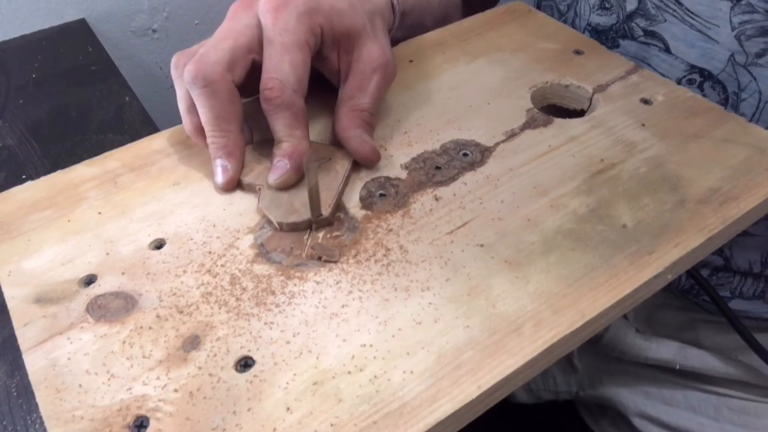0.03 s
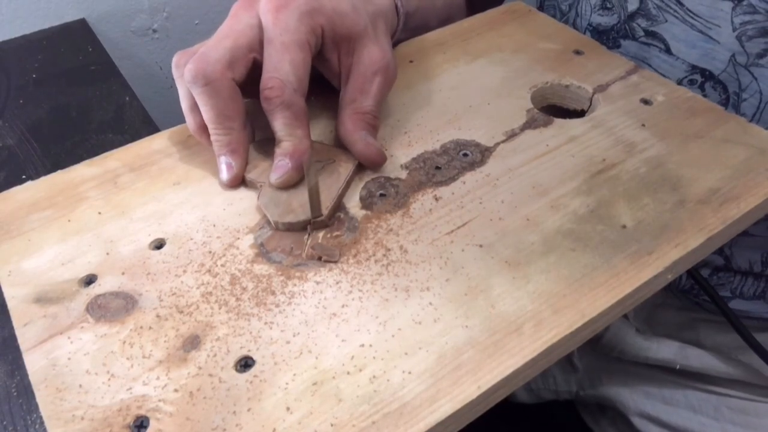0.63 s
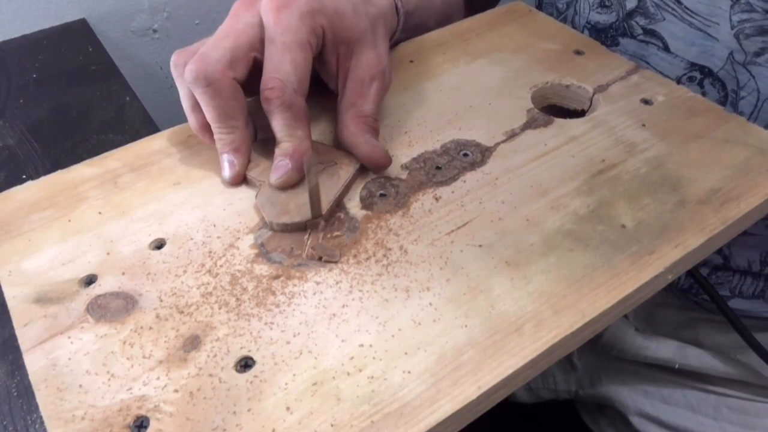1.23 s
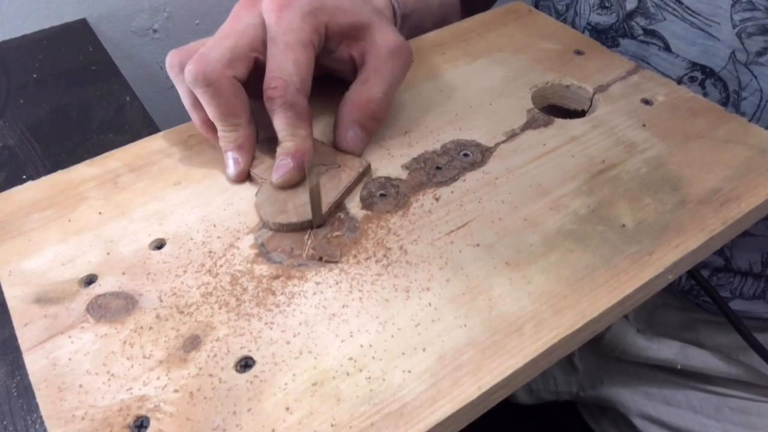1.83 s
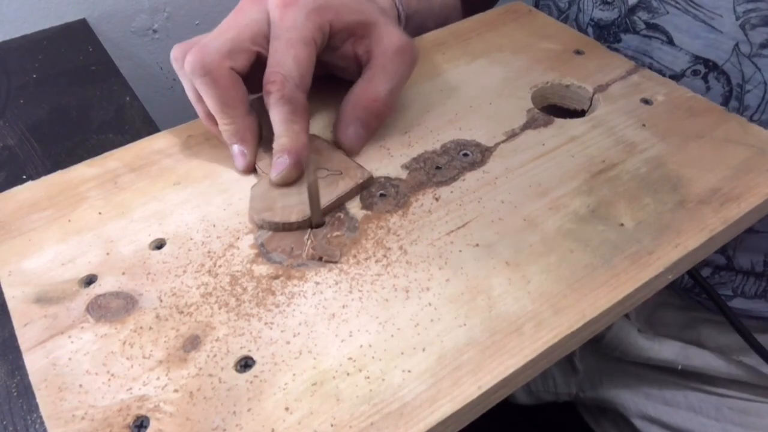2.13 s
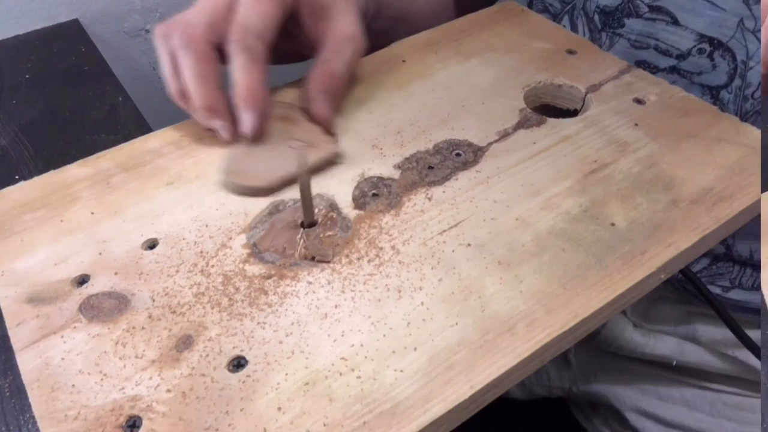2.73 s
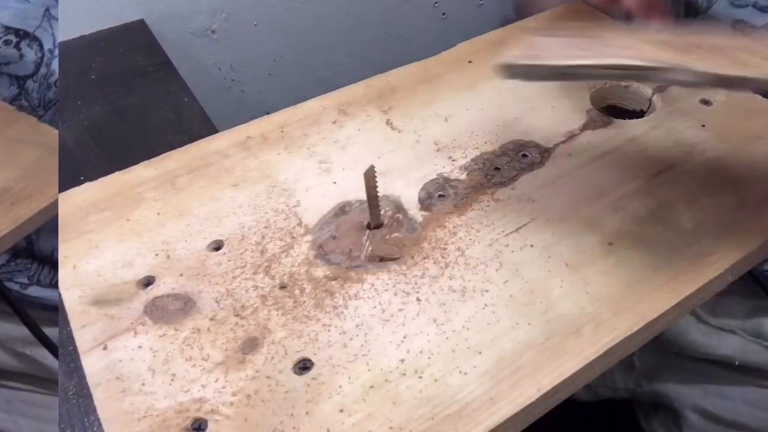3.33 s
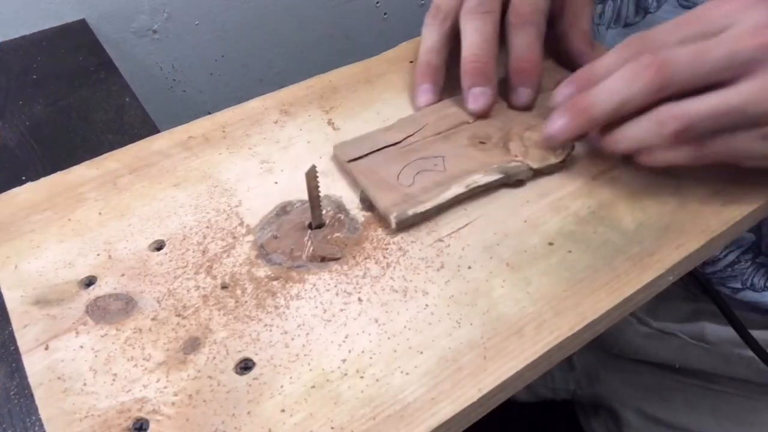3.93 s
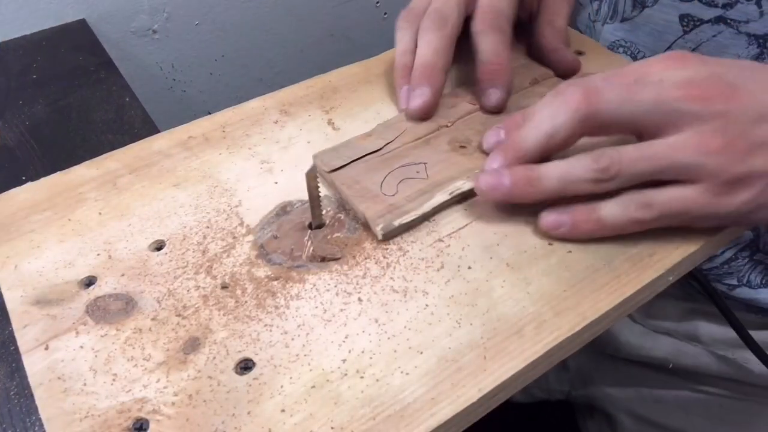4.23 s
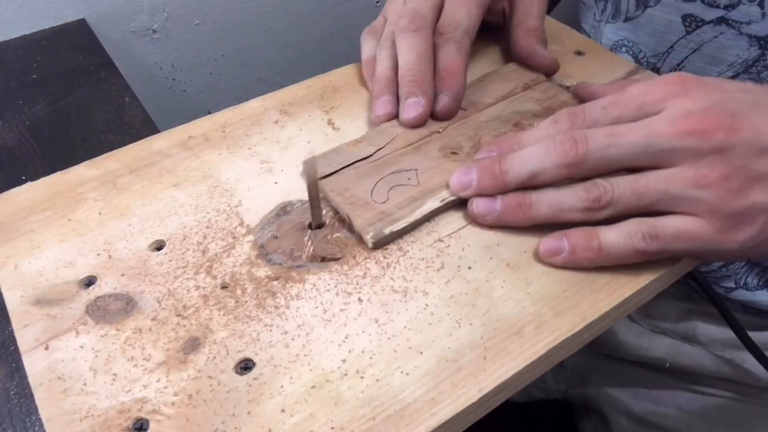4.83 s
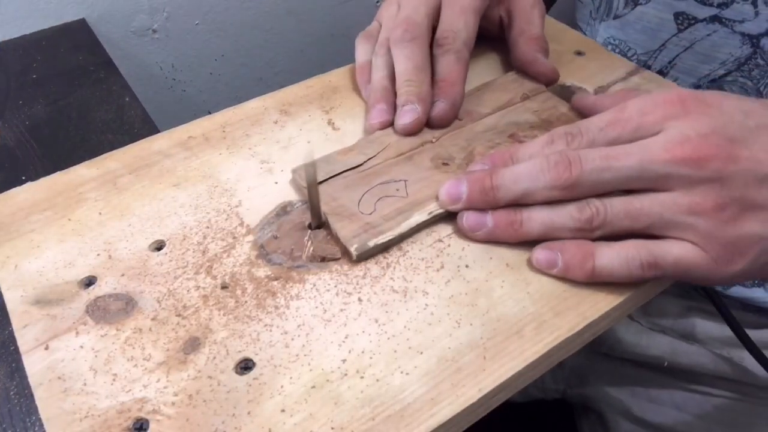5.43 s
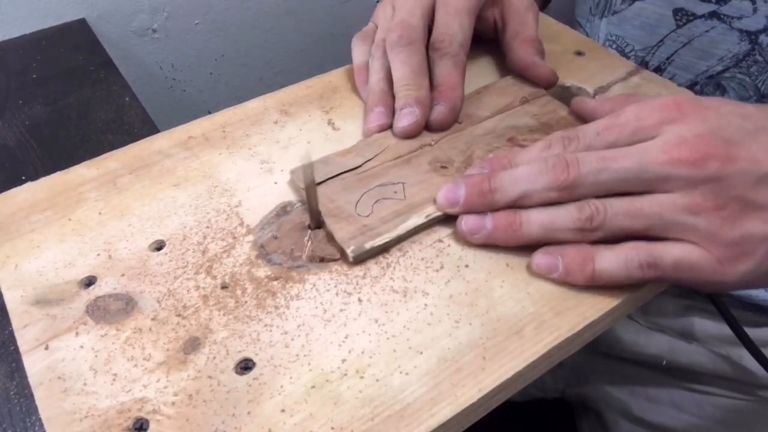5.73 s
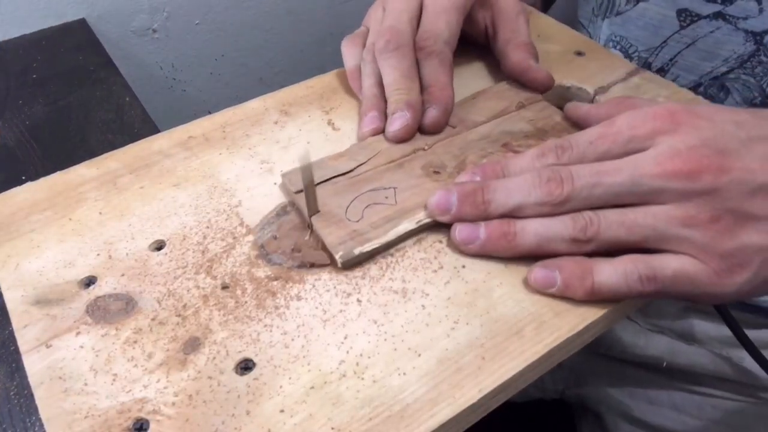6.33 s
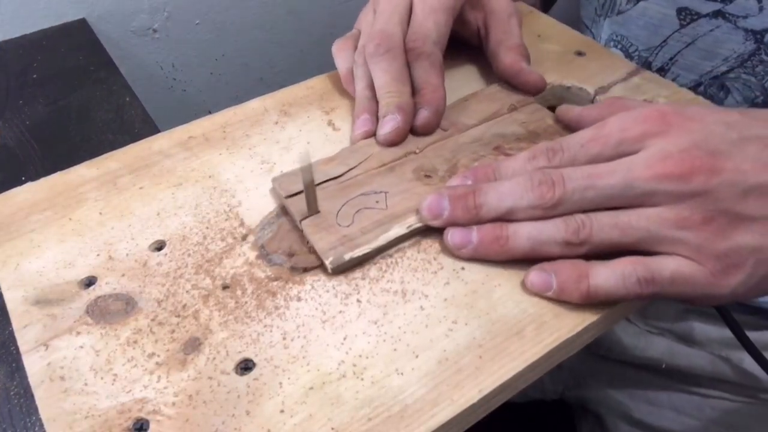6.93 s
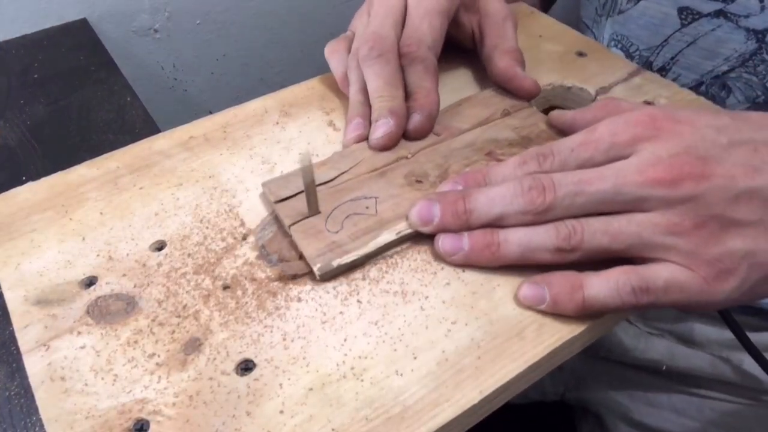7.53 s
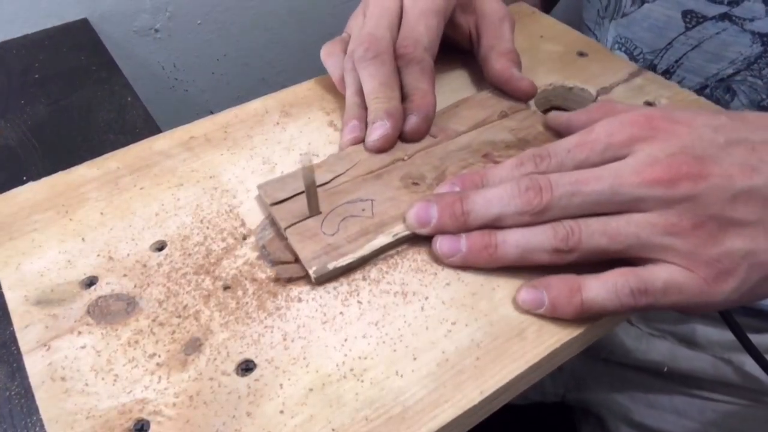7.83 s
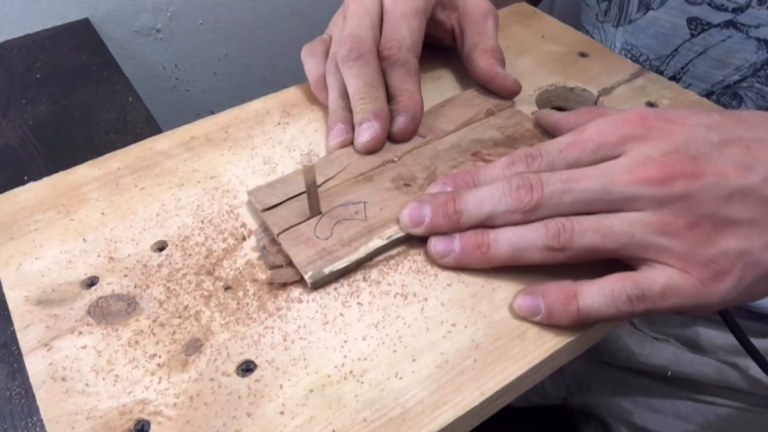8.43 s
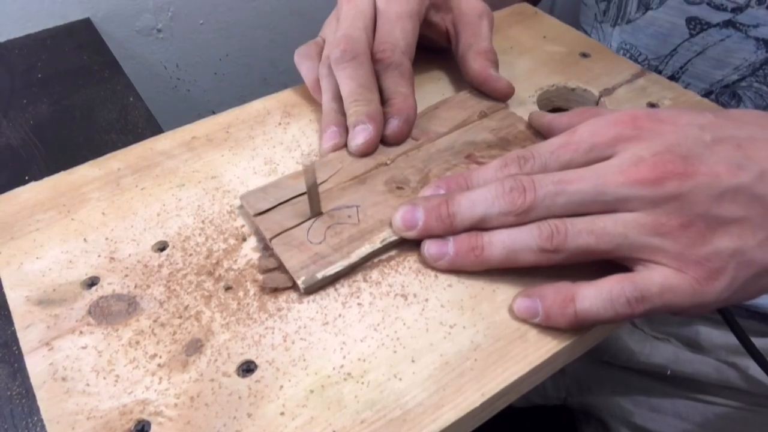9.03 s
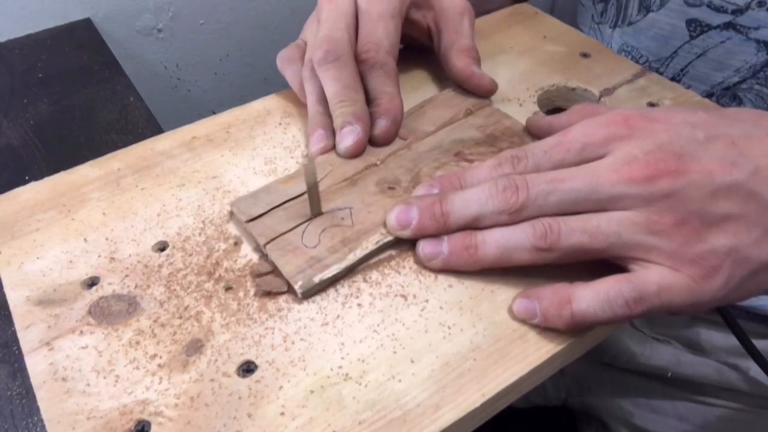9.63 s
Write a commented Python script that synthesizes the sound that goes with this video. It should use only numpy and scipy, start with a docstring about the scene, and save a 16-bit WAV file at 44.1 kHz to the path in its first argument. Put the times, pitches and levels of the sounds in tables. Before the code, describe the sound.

An electric jigsaw mounted under a wooden workbench is already cutting a small piece of wood, heard close in a small workshop. Gears rattle, teeth rasp and the bench drums, while the blade squeaks and gives short high chirps. At about 1.9 seconds the cut ends and the saw runs free, then winds down from 2.4 seconds, falling silent near 3.5. Around 3.4 seconds a board lands on the bench with a few quick hollow knocks, followed by faint scrapes and taps as it slides into place. At 4.5 seconds the saw restarts with a clack and spins up. The board chatters against the blade from about 5.3 seconds, and the teeth catch at 5.5. Steady, buzzing sawing continues until the end at about 9.5 seconds, with a low boom from the bench and a thin, high squeal from the blade.

```python
"""Small workshop, microphone close to a jigsaw mounted blade up under a plywood bench.
The saw is finishing a cut in a small piece of wood: gears rattle, the teeth rasp twice a stroke, the
bench drums, the blade squeaks in the kerf. It runs free and coasts down from 2.4 s. At 3.4 s a board
is knocked onto the bench and slid into place. The saw restarts with a clack at 4.5 s; the board chatters
against the blade, then the teeth catch at 5.5 s and cut on to the end while the bench booms."""
import sys
import numpy as np
from scipy import signal
from scipy.fft import rfft, irfft, next_fast_len
from scipy.io import wavfile
from scipy.ndimage import uniform_filter1d, minimum_filter1d, map_coordinates

SR = 44100
rng = np.random.default_rng(int(sys.argv[2]) if len(sys.argv) > 2 else 0)


def transcribe(signal):
    """Save signal, clipped to [-1, 1], as a 16-bit WAV file at the path in sys.argv[1]."""
    frames = np.atleast_2d(signal).T
    limited = np.clip(frames, -1, 1)
    pcm = np.round(limited * 32767).astype(np.int16)
    wavfile.write(sys.argv[1], SR, pcm)


N = 427329
TIME = np.arange(N) / SR

# spectra of room tone, scrape, crack, gears and each cut's rasp: (frequency [Hz], relative level [dB])
ROOM_TONE_SPECTRUM = [(15, -36), (25, -14.5), (106, 7), (335, -16), (1000, -6), (1180, -2), (1390, -20),
                      (5010, -24), (15000, -41)]
SCRAPE_SPECTRUM = [(120, -40), (200, -3), (272, -10), (350, -8), (581, -22), (1170, -17), (2020, -14),
                   (2850, -18), (3230, -15.5), (5360, -18), (15000, -33)]
CRACK_SPECTRUM = [(50, -12), (120, -3), (400, -2), (800, 2), (1300, 3), (4000, 0), (8000, -8.5),
                  (15000, -24)]
GEAR_SPECTRUM = [(35, -26), (100, -17), (145, -19.5), (205, -4.5), (270, -7.5), (340, -7.5), (470, -11),
                 (660, -7), (900, -9.5), (1150, -3.5), (1540, -9), (2400, -7.5), (4400, -9), (6000, -15.5),
                 (9000, -19), (14000, -31), (15700, -26)]
PIECE_RASP = [(300, -10.5), (1000, -10.5), (2500, -6), (3400, -6), (4300, 1), (5500, -3.5), (7300, -8.5),
              (8500, -11), (11500, -19), (14000, -16), (15700, -21.5)]
BOARD_RASP = [(300, -44), (1000, 1), (2500, -9), (3500, -3), (4500, 2), (6000, 2), (7500, 1), (8500, -6),
              (11500, -8), (14000, -12.5), (15700, -26)]
# decay of the workshop: (frequency [Hz], t60 [s])
ROOM_DECAY = [(100, 0.44), (1000, 0.23), (5000, 0.22), (15000, 0.26)]

# shoves of the board over the bench: (start [s], end [s], scrape [dB], groan [dB])
BOARD_SHOVES = [(3.64, 3.678, -55, -67), (3.686, 3.756, -47, -62), (3.837, 3.955, -63, -58),
                (3.996, 4.12, -64, -65), (4.186, 4.208, -58.5, -69), (4.341, 4.365, -59.5, -71),
                (4.445, 4.517, -67.5, -71)]
# wood set down and nudged, then a clack as the saw restarts:
# (time [s], crack [dB], thump [dB], hollow note [dB])
KNOCKS_AND_CLACK = [(3.379, -21, -44, -39), (3.402, -60, -46, -60), (3.433, -18.5, -29, -21),
                    (3.495, -13.5, -26, -27), (3.541, -32, -29.5, -32), (3.659, -47, -45, -52),
                    (3.696, -39, -53, -42), (4.207, -50, -67, -66), (4.245, -69, -58, -66),
                    (4.523, -46, -77, -70), (4.540, -29, -37, -38)]
# ring of the bench top: (frequency [Hz], level [dB], t60 [s])
BENCH_MODES = [(88, -6, .22), (113, 0, .3), (165, -4, .17), (199, 0, .21), (262, -8, .12), (345, -7, .17),
               (447, -11, .13), (721, -12, .12), (1157, -12, .09), (1400, -12, .06), (1830, -17, .06)]
# resonances: (frequency [Hz], width [Hz], relative level [dB])
FACE_MODES = [(1180, 150, -4), (1600, 120, -9), (1970, 220, -1), (3230, 290, -4), (5300, 600, -1),
              (7860, 700, -11)]  # the board's face rubbing on the bench
HOUSING_AND_HISS = [(345, 30, -4.5), (662, 40, -4), (1170, 80, -5), (1790, 50, 1), (2020, 70, -9),
                    (2450, 70, -4), (2790, 90, -4), (3200, 100, -4), (3480, 80, -4), (4260, 160, -5),
                    (5000, 160, -7), (5620, 60, -12), (11450, 300, -19), (15550, 200, -14)]  # the saw's housing ringing, plus a thin high hiss while it runs
GEAR_CASE_MODES = [(1450, 300, -45), (1604, 54, -33.5), (1697, 44, -37.5), (1790, 60, -36)]  # the mesh tone swells as it crosses these
PIECE_MODES = [(2540, 47, -5), (2720, 40, -9), (3304, 190, 2), (3970, 130, 3), (4270, 110, -8.5),
               (5110, 60, -12), (6720, 200, -4.5), (7330, 150, -3)]  # the small piece under the teeth
BOARD_MODES = [(2370, 310, -1.5), (3450, 170, -4), (3855, 210, 2), (4330, 170, -0.5), (4830, 38, -3),
               (5530, 63, -10)]  # the board under the teeth
SLAP_MODES = [(538, 44, -8.5), (670, 124, -3), (1050, 580, -5), (1136, 94, 1), (1365, 110, -9),
              (2240, 210, -2.5)]  # the work slapped on the bench
LOOSE_BOARD_MODES = [(355, 60, -1), (525, 70, -4), (692, 70, 1), (850, 90, -5), (1130, 110, -1)]  # the board slammed as the teeth catch
BOOM_MODES = [(111.5, 11, 0), (196, 26, -11.5), (261, 16, -12.5), (298, 18, -16.5), (337, 26, -11.5),
              (480, 24, -22), (646, 22, -13), (688, 16, -15), (848, 24, -18), (965, 36, -15)]  # the bench, driven by harmonics of the stroke

# crank speed under power, sagging as the wood is pushed: (time [s], speed [strokes/s])
FIRST_RUN_SPEED = [(0.0, 38.7), (0.07, 39.0), (0.52, 39.5), (1.41, 39.2), (1.68, 39.5), (1.91, 40.0),
                   (2.26, 41.3), (2.42, 41.1)]
SECOND_RUN_SPEED = [(5.6, 40.6), (5.82, 40.3), (6.0, 39.2), (6.36, 37.6), (7.22, 36.9), (7.59, 37.5),
                    (8.04, 37.6), (8.88, 38.5), (9.48, 38.5), (9.69, 38.8)]
# gear rattle of each run: (level at full speed [dB], exponent of speed, base plate within it [dB])
RUN_RATTLE = [(-26, 1.65, -10), (-23.5, 0.68, -5.5)]
# ring of the saw's base plate: (frequency [Hz], width [Hz])
PLATE_MODES = [(1152, 75), (1212, 75)]
# bench vibration from the plunger and from each cut: (multiple of the stroke rate, relative level [dB])
SHAKE_HARMONICS = [(2, 0), (4, -11), (5, -3), (6, -10)]
PIECE_DRUM = [(3, -2), (4, -13), (5, 1.5), (6, -3.5), (7, -8), (9, -8), (10, -12), (11, -8), (13, -11),
              (14, -13), (15, -14), (17, -8)]
BOARD_DRUM = [(6, -3), (10, -8), (11, -9), (13, -8), (15, -6), (16, -8), (19, -10), (20, -8), (21, -8),
              (23, -8), (27, -5), (28, -2), (29, 0), (30, -3), (36, -4), (39, -3)]
# within one stroke, up then down: (position [cycles], relative level [dB])
TOOTH_PRESSURE = [(0, -2), (.04, 8), (.2, 4), (.35, 6), (.45, 2.5), (.57, 8.5), (.68, 6.5), (.88, -0.5)]
PLUNGER_REVERSALS = [(0.051, 0), (.55, -3)]
WORK_SLAPS = [(0.051, 13.5), (0.361, 2.5), (.62, -11)]
# the kerf pinches the blade: (start [s], end [s], attack [s], pitch [Hz], half width [Hz], level [dB])
KERF_PINCHES = [(0, .5, 0.086, 13100, 900, -39), (0.474, .82, .1, 6950, 600, -33),
                (.58, 1.55, .15, 4240, 450, -36), (1.09, 1.24, 0.06, 6350, 200, -34),
                (1.413, 1.78, .08, 9650, 350, -45), (1.43, 1.8, .08, 14350, 400, -42),
                (5.45, 9.7, 0.97, 6394, 136, -28.5), (5.55, 9.7, 0.079, 5600, 200, -38),
                (5.802, 9.7, 0.75, 4800, 90, -42), (5.7, 9.7, .3, 7250, 200, -41),
                (7.75, 9.7, 0.34, 7200, 200, -33.5), (8.5, 9.7, 0.33, 1090, 110, -43)]
# single strokes that catch: (time [s], level before trim [dB], pitch [Hz])
KERF_CHIRPS = [(0.5144, -16, 7180), (0.7444, -13.5, 7210), (1.2316, -15, 6230), (1.488, -18, 6080),
               (1.5219, -21, 5620), (1.5723, -13, 5390), (1.6736, -12, 5660), (1.7024, -16, 5590),
               (1.7874, -14, 5440), (1.8572, -14, 6480), (1.9071, -12, 6920), (1.932, -11, 7100),
               (1.957, -10.5, 7230)]
# the small piece, then the board: (start [s], end [s], attack [s], release t60 [s], gear load [0-1],
# rasp [dB], ring [dB], slap [dB], drumming [dB], boom [dB])
SAW_CUTS = [(-.3, 1.862, 0.25, .4, 0.02, -24.5, -29, -40, -31.5, -61),
            (5.5, 9.7, 0.18, .5, 0.51, -29, -30.5, -30, -33.5, -24)]

OFF_S, COAST_S = 2.42, 1.3  # switched off; friction stops the crank in this time
STALL_S, STALL_FADE_S = 3.51, 0.098  # the gears fall silent once the crank barely turns
ON_S, SPIN_UP_S = 4.535, 0.21  # switched on again; time constant of the run-up
FULL_SPEED, SLOWEST_SPEED = 41.5, 36.9  # working range [strokes/s]
GEAR_TEETH, ROTOR_RATIO = 43, 8.6  # tooth contacts and armature turns per stroke
IDLE_LOAD, LOADED_RATTLE_DB = 0.059, -5.5  # gear load running free; change of the rattle at full load
HOUSING_DB, SHAKE_DB = -8, -36  # housing ring and hiss within the rattle; plunger shake at full speed
HOUSING_HELD_DB, PLATE_HELD_DB, SHAKE_HELD_DB = -6.5, -4.5, -7.5  # change with wood on the blade


def amp(db):
    """Decibels to gain."""
    return 10 ** (np.asarray(db) / 20)


def unit(x):
    """Scale to rms 1."""
    return x / np.sqrt(np.mean(x ** 2) + 1e-20)


def along(points, hz):
    """Interpolate (frequency [Hz], value) points on a log axis."""
    f, v = np.transpose(points)
    return np.interp(np.log(hz + 1), np.log(f + 1), v)


def wobble(rate):
    """A smooth random curve, rate knots a second."""
    knots = np.arange(0, N * rate / SR + 1, 1 / 8)
    curve = map_coordinates(rng.standard_normal(int(knots[-1]) + 4), [knots])
    return np.interp(TIME * rate, knots, curve)


def grains(rate, spread_db):
    """Tiny random impacts of uneven size, rate a second."""
    hits = (rng.random(N) < rate / SR) * rng.standard_normal(N)
    return unit(hits * amp(spread_db * rng.standard_normal(N)))


def envelope(start, end, attack, t60):
    """A straight rise, a hold until the end, then an exponential release."""
    return np.clip((TIME - start) / attack, 0, 1) * amp(-60 * np.maximum(TIME - end, 0) / t60)


def filtered(x, response):
    """x through a frequency response."""
    size = next_fast_len(N + SR // 2)
    return irfft(rfft(x, size) * response(np.fft.rfftfreq(size, 1 / SR)), size)[:N]


def coloured(x, spectrum):
    """x shaped by a spectrum, at rms 1."""
    return unit(filtered(x, lambda hz: amp(along(spectrum, hz))))


def resonance(f, hz, width):
    """Complex response at f of one mode centred on hz."""
    return 1j * f * width / (hz * hz - f * f + 1j * f * width)


def resonate(x, modes):
    """x through a bank of resonances, at rms 1."""
    return unit(filtered(x, lambda f: sum(amp(db) * resonance(f, hz, width) for hz, width, db in modes)))


def narrow(x, hz, width):
    """x through one resonance with steep skirts, at rms 1."""
    return unit(filtered(x, lambda f: resonance(f, hz, width) ** 2))


def swell(hz, centre, width):
    """Gain of a tone that passes through a resonance."""
    return 1 / (1 + (2 * (hz - centre) / width) ** 2)


def room_tone():
    """The workshop's faint, steady background."""
    return amp(-70) * coloured(rng.standard_normal(N), ROOM_TONE_SPECTRUM)


def wall_reflections(x):
    """The near walls return a short tail with little bass, 5 ms behind the direct sound."""
    hz, t, noise = signal.stft(rng.standard_normal(SR // 2), SR, nperseg=256)
    tail = signal.istft(noise * amp(-60 * t / along(ROOM_DECAY, hz)[:, None]), SR, nperseg=256)[1]
    thinned = filtered(x, lambda f: f / np.hypot(f, 450))
    return signal.fftconvolve(np.pad(thinned, (SR // 200, 0)), tail / np.linalg.norm(tail))[:N]


def board_slide():
    """With each shove the board scrapes unevenly over sawdust, and the bench groans under it."""
    scrape = sum(amp(db) * envelope(start, end, 0.02, t60=0.24) for start, end, db, _ in BOARD_SHOVES)
    groan = sum(amp(db) * envelope(start, end, 0.02, t60=0.52) for start, end, _, db in BOARD_SHOVES)
    grit = coloured(grains(rate=6400, spread_db=0.5), SCRAPE_SPECTRUM)
    grit += amp(-7) * resonate(grains(rate=3300, spread_db=1), FACE_MODES)
    hum = resonate(rng.standard_normal(N), [(350, 16, 0), (1600, 30, -16)])
    return scrape * grit * amp(0.86 * wobble(90)) + groan * hum


def knocks_and_clack(crack_t60=0.02, buzz_t60=0.11, hollow_hz=339, hollow_t60=0.11):
    """Wood set down, then the saw's restart clack: each a crack, buzz, hollow note and bench ring."""
    cracks, thumps, t = np.zeros(N), np.zeros(N), TIME[:SR // 2]
    crack_decay = amp(-60 * t / crack_t60) + amp(-14 - 60 * t / buzz_t60)
    thump_rise = 1 - np.exp(-t / 0.0023)
    for start, crack_db, thump_db, hollow_db in KNOCKS_AND_CLACK:
        span = slice(round(start * SR), round(start * SR) + len(t))
        cracks[span] += amp(crack_db) * crack_decay * rng.standard_normal(len(t))
        ring = sum(amp(db + rng.normal(0, 1.5) - 60 * t / t60)
                   * np.sin(2 * np.pi * (hz * t + rng.random())) for hz, db, t60 in BENCH_MODES)
        hollow = amp(hollow_db - 60 * t / hollow_t60) * np.sin(2 * np.pi * hollow_hz * t)
        thumps[span] += (amp(thump_db) * ring + hollow) * thump_rise
    return filtered(cracks, lambda hz: amp(along(CRACK_SPECTRUM, hz))) + thumps


def crank_speed():
    """Strokes a second: the first run coasts to a stop, the second spins up from rest."""
    coast = np.clip(1 - (TIME - OFF_S) / COAST_S, 0, 1)
    spin_up = 1 - np.exp(-np.maximum(TIME - ON_S, 0) / SPIN_UP_S)
    return (coast * np.interp(TIME, *np.transpose(FIRST_RUN_SPEED))
            + spin_up * np.interp(TIME, *np.transpose(SECOND_RUN_SPEED)))


def pressure_db(turns):
    """Tooth pressure as the crank turns."""
    return np.interp(turns, *np.transpose(TOOTH_PRESSURE), period=1)


def stroke_hits(turns, pattern, jitter, spread_db):
    """Uneven impacts at each (position [cycles], level [dB]) of the stroke, a little early or late."""
    hits = np.zeros(N)
    for position, db in pattern:
        at = np.flatnonzero(np.diff(np.floor(turns - position + jitter * wobble(40))) > 0)
        hits[at] += amp(db + spread_db * rng.standard_normal(len(at)))
    return hits


def harmonic(k, turns, rough_turns=0.0021):
    """One overtone of the stroke; the loose work makes the high ones rougher."""
    return np.sin(2 * np.pi * (k * (turns + rough_turns * wobble(55)) + rng.random()))


def rotor_hum(speed, turns):
    """The armature's unbalance hums where it meets a resonance of the housing."""
    gain = amp(-41) * swell(ROTOR_RATIO * speed, centre=353, width=32) * speed / FULL_SPEED
    return gain * unit(harmonic(ROTOR_RATIO, turns))


def plunger_shake(speed, turns, held):
    """The plunger swings the bench, mostly at twice the stroke rate."""
    swing = unit(sum(amp(db + 0.57 * wobble(19)) * harmonic(k, turns) for k, db in SHAKE_HARMONICS))
    return amp(SHAKE_DB + SHAKE_HELD_DB * held) * (speed / FULL_SPEED) ** 4.4 * swing


def gear_whine(speed, turns):
    """The mesh tone rings the gear case; backlash makes it waver and the stroke gives it sidebands."""
    angle = 2 * np.pi * turns
    mesh = np.sin(GEAR_TEETH * angle + 0.42 * wobble(45) + 0.55 * np.sin(2 * angle))
    pulsing = unit(mesh * (1 + 0.4 * np.sin(angle)) * amp(0.87 * wobble(25)))
    case = sum(amp(db) * swell(GEAR_TEETH * speed, hz, width) for hz, width, db in GEAR_CASE_MODES)
    return case * (speed / FULL_SPEED) ** 2.1 * pulsing


def base_plate(turns):
    """The plunger knocks the base plate at each reversal, and the gears keep it ringing in between."""
    drive = 0.5 * grains(rate=2500, spread_db=1.5)
    drive += unit(stroke_hits(turns, PLUNGER_REVERSALS, jitter=0.012, spread_db=1))
    rings = (narrow(np.roll(drive, 97 * k), hz, width) for k, (hz, width) in enumerate(PLATE_MODES))
    return unit(sum(rings))


def gear_knocks(turns, corner_hz=700):
    """Each gear tooth has its own size and spacing error: small, thin knocks that repeat every turn."""
    size, lag = rng.standard_normal(GEAR_TEETH), rng.random(GEAR_TEETH)
    count = np.arange(int(turns[-1] * GEAR_TEETH))
    tooth = count % GEAR_TEETH
    scatter = 0.09 * rng.standard_normal(len(count))
    at = np.interp((count + lag[tooth] + scatter) / GEAR_TEETH, turns, np.arange(N)).astype(int)
    knocks = unit(np.bincount(at, np.tanh(2 * size[tooth]), N))
    return filtered(knocks, lambda hz: hz ** 2 / np.hypot(hz ** 2, corner_hz ** 2))


def gear_rattle(speed, turns, held, load):
    """Free gears rattle at random, loaded ones knock in step; housing and base plate ring along."""
    first, second = [amp(db) * (speed / FULL_SPEED) ** power for db, power, _ in RUN_RATTLE]
    stall = np.clip((STALL_S - TIME) / STALL_FADE_S, 0, 1)
    drive = np.where(TIME < ON_S, first * stall, second) * amp(LOADED_RATTLE_DB * load)
    clatter = grains(rate=20000, spread_db=0.5) * amp(0.37 * pressure_db(turns) + wobble(70))
    loose = np.sqrt(1 - load) * unit(clatter)
    tight = np.sqrt(load) * gear_knocks(turns)
    # the housing rings most with loose gears; a thin high hiss sits on top
    ring_and_hiss = resonate(loose + 0.1 * tight, HOUSING_AND_HISS)
    ring_and_hiss *= amp(HOUSING_DB + HOUSING_HELD_DB * held)
    plate_db = np.where(TIME < ON_S, *[db for _, _, db in RUN_RATTLE])
    plate = amp(plate_db + PLATE_HELD_DB * held) * base_plate(turns)
    return drive * (coloured(loose + tight, GEAR_SPECTRUM) + ring_and_hiss + plate)


def motor(speed, turns):
    """The saw's body under the bench; wood held on the blade loads the gears and quietens it."""
    contacts = [envelope(*row[:4]) for row in SAW_CUTS]
    held = sum(contacts)
    load = np.clip(IDLE_LOAD + sum(row[4] * contact for row, contact in zip(SAW_CUTS, contacts)), 0, 1)
    return (gear_rattle(speed, turns, held, load) + gear_whine(speed, turns)
            + plunger_shake(speed, turns, held) + rotor_hum(speed, turns))


def board_chatter(turns):
    """The board's edge bounces unevenly off the moving teeth."""
    hops = grains(rate=830, spread_db=3.5) * amp(pressure_db(turns))
    bench = [(hz, 1.6 / t60 + 25, db) for hz, db, t60 in BENCH_MODES[3:]]
    wood = resonate(hops, SLAP_MODES) + amp(-8) * resonate(hops, bench)
    return amp(-23) * envelope(5.28, 5.53, attack=0.058, t60=3) * wood


def teeth_catch(turns):
    """Each stroke lifts the loose board and slams it down; the bark fades as the hands press harder."""
    slams = stroke_hits(turns, [(0.05, 0)], jitter=0.003, spread_db=1.5)
    bark = unit(sum(amp(db) * narrow(np.roll(slams, 150 * k), hz, width)
                    for k, (hz, width, db) in enumerate(LOOSE_BOARD_MODES)))
    return amp(-28.5) * envelope(5.56, 5.85, attack=0.06, t60=1.3) * bark


def kerf_squeak(turns):
    """Where the kerf pinches, blade and wood shriek on each upstroke and ring faintly in between."""
    upstroke = np.exp(7 * (np.cos(2 * np.pi * (turns - 0.05)) - 1))
    grip = (upstroke + 0.42) * amp(1.2 * wobble(35))
    return sum(amp(db) * envelope(start, end, attack, t60=0.24)
               * narrow(grip * rng.standard_normal(N), hz, 2 * half_width)
               for start, end, attack, hz, half_width, db in KERF_PINCHES)


def kerf_chirps(trim_db=-3.5, rise_s=0.0013, waver_share=0.032):
    """As the first cut nears the edge, single strokes catch in the kerf and chirp."""
    chirps, t = np.zeros(N), TIME[:SR // 20]
    shape = t / rise_s * np.exp(1 - t / rise_s)
    for start, db, hz in KERF_CHIRPS:
        waver = waver_share * unit(uniform_filter1d(rng.standard_normal(len(t)), size=30))
        tone = np.sin(2 * np.pi * np.cumsum(hz * (1 + waver)) / SR)
        chirps[round(start * SR):][:len(t)] += amp(db + trim_db) * shape * tone
    return chirps


def bench_boom(speed, turns):
    """Each bench mode booms whenever the saw's speed brings a harmonic of the stroke onto it."""
    boom = np.zeros(N)
    for hz, width, db in BOOM_MODES:
        orders = range(int(np.ceil(hz / FULL_SPEED)), int(hz / SLOWEST_SPEED) + 2)
        tones = sum(swell(k * speed, hz, width) * harmonic(k, turns) for k in orders)
        boom += np.sqrt(2) * amp(db + 0.73 * wobble(9)) * tones
    return boom


def drifting(x, depth_db):
    """Resonances come and go at random, as when the kerf lengthens and the fingers shift."""
    frames = signal.stft(x, nperseg=512)[2]
    across_pitch = uniform_filter1d(rng.standard_normal(frames.shape), size=4, axis=0)
    drift = unit(uniform_filter1d(across_pitch, size=70, axis=1))
    return unit(signal.istft(frames * amp(depth_db * drift), nperseg=512)[1][:N])


def cut(speed, turns, row, drum_harmonics, rasp_spectrum, modes, bite_depth, drift_db):
    """Teeth tear fibres on each stroke, and drag the hand-fed work up and down on the bench."""
    rasp_db, ring_db, slap_db, drum_db, boom_db = row[5:]
    feed = envelope(*row[:4]) * amp(0.5 * wobble(4))
    bite = amp(bite_depth * pressure_db(turns) + 2 * wobble(90))
    rasp = drifting(coloured(bite * grains(rate=16000, spread_db=3), rasp_spectrum), drift_db)
    ring = drifting(resonate(bite * grains(rate=9000, spread_db=2), modes), drift_db)
    drum = unit(sum(amp(db + 0.54 * wobble(11)) * harmonic(k, turns) for k, db in drum_harmonics))
    slaps = resonate(stroke_hits(turns, WORK_SLAPS, jitter=0.003, spread_db=4.7), SLAP_MODES)
    wood = amp(rasp_db) * rasp + amp(ring_db) * ring + amp(slap_db) * slaps
    bench = amp(drum_db) * drum + amp(boom_db) * bench_boom(speed, turns)
    return feed * (wood + bench)


def scene():
    """Mono, close to the bench, with the room behind; one crank drives the running saw's sounds."""
    speed = crank_speed()
    turns = np.cumsum(np.maximum(speed, 2) * (1 + 0.001 * wobble(12))) / SR
    piece = cut(speed, turns, SAW_CUTS[0], PIECE_DRUM, PIECE_RASP, PIECE_MODES,
                bite_depth=1.15, drift_db=1.9)
    board = cut(speed, turns, SAW_CUTS[1], BOARD_DRUM, BOARD_RASP, BOARD_MODES,
                bite_depth=1, drift_db=1.2)
    direct = piece + board + motor(speed, turns) + kerf_squeak(turns) + kerf_chirps()
    direct += board_chatter(turns) + teeth_catch(turns) + knocks_and_clack() + board_slide()
    return (room_tone() + direct + amp(-9) * wall_reflections(direct))[None]


def record(dry, ceiling=0.37, low_cut_hz=42, top_hz=15800):
    """Behind the microphone a limiter holds the peaks down; deepest bass and top treble are cut."""
    needed = np.minimum(1, ceiling / (np.abs(dry[0]) + 1e-9))
    gain = uniform_filter1d(minimum_filter1d(needed, size=64), size=64)
    low_pass = lambda hz: np.clip((top_hz - hz) / 200 + 0.5, 0, 1)
    high_pass = lambda hz: hz ** 2 / np.hypot(hz ** 2, low_cut_hz ** 2)
    return filtered(dry[0] * gain, lambda hz: low_pass(hz) * high_pass(hz))[None]


dry = scene()
out = record(dry)
transcribe(out)
```